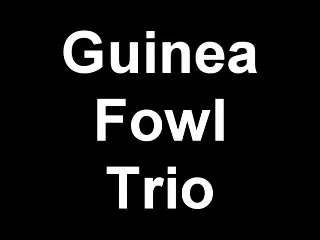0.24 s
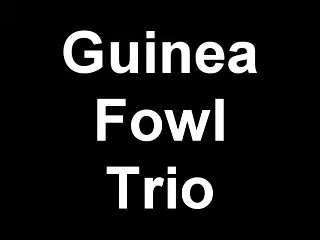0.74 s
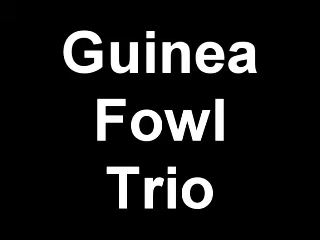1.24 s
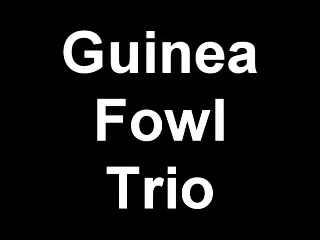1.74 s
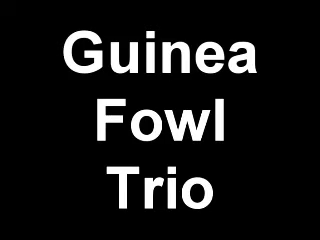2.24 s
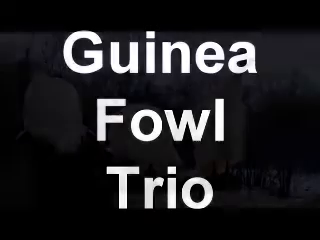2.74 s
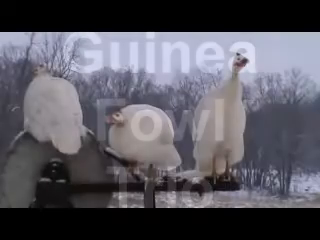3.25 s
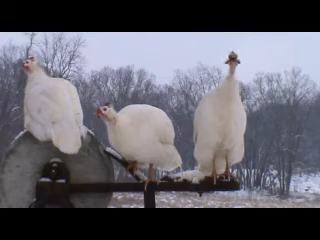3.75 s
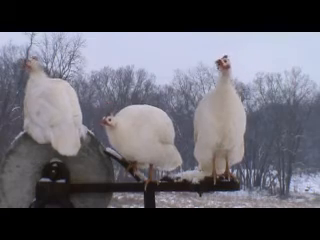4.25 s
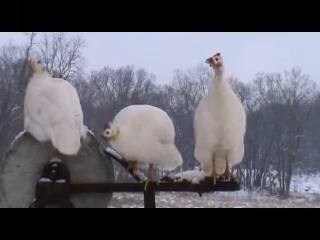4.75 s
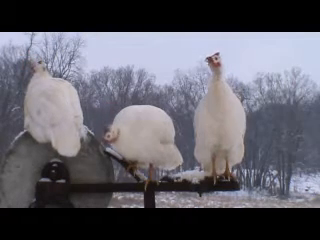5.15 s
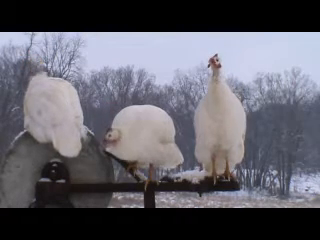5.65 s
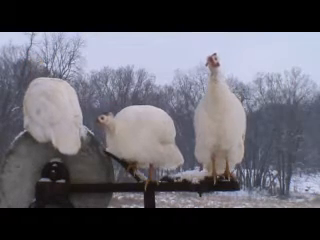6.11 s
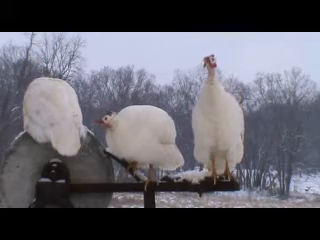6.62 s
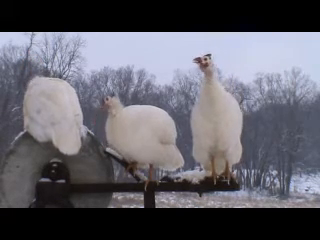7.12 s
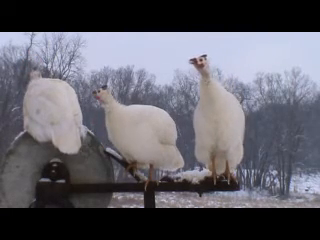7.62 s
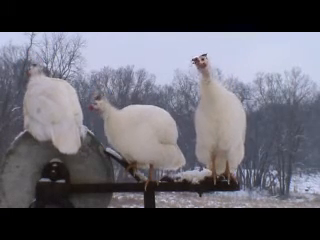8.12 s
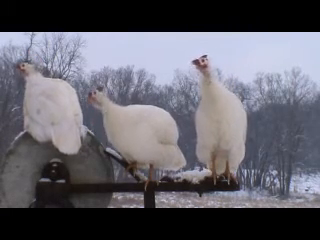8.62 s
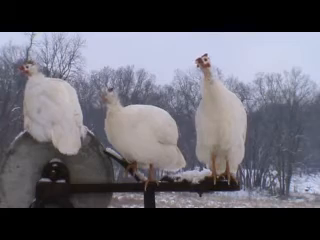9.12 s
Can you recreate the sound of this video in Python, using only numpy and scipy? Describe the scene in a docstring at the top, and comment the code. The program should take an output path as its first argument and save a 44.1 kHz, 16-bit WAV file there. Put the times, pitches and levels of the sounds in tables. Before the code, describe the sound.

Harsh guinea fowl squawks and a long falling wail cut off abruptly, followed by uneven three-bird chatter, buffeting wind and a few small chirps.

```python
"""A winter yard with guinea fowl. One very close bird gives harsh squawks, cries and a long falling wail, then
a trio chatters in thin whistles, low hoots and rasps. Clear notes are summed harmonics with a shaky pitch;
rasps are torn partials of a slow, uneven beat plus puffs of noise. Faint nasal moans are clear notes too.
Wind noise buffets the microphone, a small bird's chirps are falling tones with noise, and dry ticks are noise
bursts. Decaying noise gives a faint echo, over a low outdoor rumble, with a faint swelling treble hiss."""
import sys
import numpy as np
from scipy import signal
from scipy.fft import rfft, irfft, next_fast_len
from scipy.io import wavfile

SR = 44100
rng = np.random.default_rng(int(sys.argv[2]) if len(sys.argv) > 2 else 0)


def transcribe(u):
    """Save the signal u as a 16-bit wav file named by the first command-line argument.

    u: samples, shape (n,) or (channels, n), limited to [-1, 1]; the rate is SR.
    q: integer samples, one column per channel.
    """
    v = np.clip(np.atleast_2d(u).T, -1, 1)
    q = np.round(v * 32767).astype(np.int16)
    wavfile.write(sys.argv[1], SR, q)


N = 413216
TIME = np.arange(N) / SR
TOP_HZ = 15600
WAIL_END_S, TRIO_START_S = 2.145, 2.206
# progress through a call, and a bow that is 1 at both ends and 0 in the middle
PROGRESS = np.linspace(0, 1, 61)
BOW = (2 * PROGRESS - 1) ** 2


def undb(db):
    """Decibels to gain."""
    return 10 ** (np.asarray(db) / 20)


def unit(x):
    """Scale to rms 1."""
    return x / np.sqrt(np.mean(x ** 2) + 1e-18)


def colour_at(points, hz):
    """Gain of a (Hz, dB) colour at the given frequencies, interpolated over log frequency."""
    f, db = np.transpose(points)
    return undb(np.interp(np.log(np.maximum(hz, 1)), np.log(f), db))


def ring(points, size=1024):
    """Causal (minimum-phase) impulse response of a colour, from its cepstrum."""
    hz = np.arange(size + 1) * SR / (2 * size)
    cepstrum = irfft(np.log(colour_at(points, hz)))
    cepstrum[1:size] *= 2
    cepstrum[size + 1:] = 0
    return irfft(np.exp(rfft(cepstrum)))[:size]


def noise(points):
    """Noise of a given colour, rms 1."""
    size = next_fast_len(N, True)
    white = rfft(rng.standard_normal(size))
    hz = np.arange(len(white)) * SR / size
    return unit(irfft(white * colour_at(points, hz), size)[:N])


def walk(rate_hz):
    """Smooth random motion, rms 1, with rate_hz new random targets a second."""
    steps = rng.standard_normal(N // 8)
    return unit(np.interp(TIME * rate_hz, np.arange(len(steps)), steps))


def gate(start_s, end_s, edge_s):
    """Open from start to end, with soft edges centred on both."""
    return np.clip(np.minimum(TIME - start_s, end_s - TIME) / edge_s + .5, 0, 1)


def envelope(calls, axis=1, edge_s=.007):
    """Gain over time from one dB column of a list of calls, with soft edges."""
    out = np.zeros(N)
    for call in calls:
        s = call[:, 0]
        first_s, last_s = s[0] - edge_s, s[-1] + edge_s
        on = slice(*np.searchsorted(TIME, [first_s, last_s]))
        gain = np.pad(undb(call[:, axis]), 1)
        out[on] += np.interp(TIME[on], [first_s, *s, last_s], gain)
    return out


def strikes(events):
    """One impulse for each (s, dB) row."""
    out = np.zeros(N)
    for s, db in events:
        out[int(s * SR)] += undb(db)
    return out


def through(x, response):
    """Pass a sound through an impulse response."""
    return signal.oaconvolve(x, response)[:N]


def contour(start_s, length_s, *controls):
    """The controls of one call, laid out over its time."""
    return np.column_stack(np.broadcast_arrays(start_s + length_s * PROGRESS, *controls))


def arch(peak, start_db=-10.5, end_db=-20):
    """Level in dB of a push of air that builds up to its peak and dies away."""
    peak = np.clip(peak, .02, .98)
    build = start_db * (1 - PROGRESS / peak) ** 2
    decay = end_db * ((PROGRESS - peak) / (1 - peak)) ** 2
    return np.where(PROGRESS < peak, build, decay)


def swells(events):
    """Gain over time of a table of swells."""
    return envelope([contour(start, length, db + arch(peak)) for start, length, peak, db in events])


def beat(calls):
    """Pitch or beat rate (last column) over time: each call takes over from the one before."""
    starts = [call[0, 0] for call in calls[1:]] + [np.inf]
    rows = np.vstack([call[call[:, 0] < until] for call, until in zip(calls, starts)])
    return np.interp(TIME, rows[:, 0], rows[:, -1])


def notes(calls, throat, chaos, jitter, chaos_jitter, shimmer, upper_db, edge_s, tremble=0 * TIME):
    """A steadily beating syrinx; its pitch and strength shake more as the rasp (chaos) takes over."""
    out, shake, flutter, waver = np.zeros(N), walk(700), walk(450), walk(130)
    for call in calls:
        s, pitch, *levels = np.transpose(call)
        opening = gate(s[0], s[-1], edge_s)
        on = opening > 0
        *low, upper = (undb(np.interp(TIME[on], s, db)) for db in levels)
        rough = chaos[on] / (chaos[on] + sum(low))
        wobble = tremble[on] + jitter * waver[on] + chaos_jitter * rough * shake[on]
        hz = np.interp(TIME[on], s, pitch) * (1 + wobble)
        k = np.arange(1, int(TOP_HZ / pitch.min()) + 1)[:, None]
        # the lowest harmonics have their own levels; the upper ones share the throat's colour
        high = colour_at(throat, k[len(low):] * hz)
        high *= undb(upper_db) * upper / np.sqrt(np.sum(high ** 2, axis=0))
        phase = 2 * np.pi * k * np.cumsum(hz) / SR + k ** 2
        tone = np.sum(np.vstack([*low, high]) * np.sin(phase), axis=0)
        # a push of air that raises the pitch also makes the note louder
        push = 1 + shimmer * rough * flutter[on] + 11 * tremble[on]
        out[on] += np.sqrt(2) * tone * opening[on] * push
    return out


def beak_gain(beak, hz, strain):
    """An open-beak resonance that stands out more the harder the bird calls."""
    centre_hz, width_hz, db = beak
    return undb(db * strain ** 2 * np.exp(-((hz - centre_hz) / width_hz) ** 2))


def rasp_shapes(events, climb_hz_per_s):
    """Body and treble of a rasp swell together while its beat quickens."""
    return [contour(start, length, body + arch(peak), treble + arch(peak), hz + climb_hz_per_s * length * PROGRESS)
            for start, length, peak, body, treble, hz in events]


def rasp(calls, body, treble, beak, body_db, treble_db, tear_rad, count=10):
    """The voice broken into a slow, uneven beat; the harder the call, the more its partials tear apart."""
    strength = envelope(calls, axis=1)
    strain = .3 + np.minimum(strength / undb(-27), .7)
    rate = beat(calls) * (1 + .025 * strain * walk(60))
    cycle = np.cumsum(rate) / SR + .02 * strain * walk(300)
    low = np.zeros(N)
    for k in range(2, count):  # the throat does not pass the beat's own fundamental
        # each partial's level wanders, and its phase slips against the beat
        share = 1 + .6 * np.tanh(walk(140))
        slip = tear_rad * strain * walk(190)
        gain = colour_at(body, k * rate) * beak_gain(beak, k * rate, strain)
        low += gain * share * np.sin(2 * np.pi * k * cycle + k ** 2 + slip)
    # each beat lets out a puff of turbulent air
    puffs = unit((.4 + np.exp(-(cycle % 1) / .35)) * rng.standard_normal(N))
    pulses = unit(np.diff(np.floor(cycle), prepend=0))
    low = unit(low) + .08 * unit(through(puffs, ring(body)))
    treble_flicker = undb(3.5 * strain * np.tanh(walk(80)))
    high = unit(through(puffs + pulses, ring(treble))) * treble_flicker
    return undb(body_db) * low * strength + undb(treble_db) * high * envelope(calls, axis=2)


def echo(x, t60_s, db):
    """Scattered, dull reflections from ground, sheds and trees: decaying low-passed noise."""
    t = TIME[:SR // 2]
    tail = rng.standard_normal(len(t)) * np.exp(-np.log(1000) * t / t60_s) * (t > .004)
    tail = signal.lfilter([1], [1, -.45], tail)
    return undb(db) * through(x, tail / np.sqrt(np.sum(tail ** 2)))


# Outdoor air colours during the close bird and from the trio on. Each row: frequency in Hz, relative level in dB.
EARLY_AIR = [(15, -36), (25, -1.5), (110, -5.5), (297, -24.5), (433, -17), (495, -14.5), (567, -21),
             (1530, -22), (2700, -30.5), (7910, -42), (13900, -32), (15500, -53)]
YARD_AIR = [(15, -32), (25, 5), (126, 0), (260, -12), (895, -9), (1750, -7.5), (1900, -11.5), (2420, -17.5),
            (3170, -24), (3630, -24), (4870, -27), (5430, -27.5), (8580, -30), (12800, -33), (15500, -53)]
EARLY_AIR_DB, YARD_AIR_DB = -48, -45
# Treble hiss colour. Each row: frequency in Hz, relative level in dB.
HISS_COLOUR = [(2000, 2), (5000, -1.5), (7000, -2), (9000, 2.5), (11000, -1.5), (13000, -12.5),
               (15500, -39)]
# Hiss swells. Each row: start in seconds, length in seconds, peak place 0-1, relative level in dB.
HISS_SWELLS = [(.72, 1.17, 0.26, -43), (1.55, 0.65, 0.99, -42), (3.5, 2.12, 0, -44),
               (6.23, 0.49, 0.42, -43), (8.68, 0.79, 0.05, -44)]


def background(early, later):
    """Low outdoor rumble that wavers a little, and a faint treble hiss that swells."""
    air = early * undb(EARLY_AIR_DB) * noise(EARLY_AIR) + later * undb(YARD_AIR_DB) * noise(YARD_AIR)
    hiss = noise(HISS_COLOUR) * (undb(-64) + swells(HISS_SWELLS))
    return air * undb(.5 * walk(17)) + undb(-5.5) * hiss * (early + later)


# Gust swells. Each row: start in seconds, length in seconds, peak place 0-1, relative level in dB.
GUST = [(3.25, 0.081, 0.25, -49), (3.56, 0.45, 0.53, -38.5), (4.02, 0.12, 0.4, -47.5),
        (4.25, 0.28, 0.61, -39), (4.48, 0.21, 0.4, -39), (4.735, 0.052, 0.07, -37.5)]
# Single buffets. Each row: time in seconds, relative peak in dB.
BUFFETS = [(3.58, -27), (3.739, -25), (3.781, -18.5), (3.808, -18), (3.822, -20.5), (3.832, -21),
           (3.892, -18.5), (4.085, -29.5), (4.249, -20.5), (4.527, -24), (4.544, -23), (4.562, -23),
           (4.584, -21.5), (4.636, -18.5), (4.736, -16), (4.751, -22)]
# Wind colour at the microphone. Each row: frequency in Hz, relative level in dB.
WIND_COLOUR = [(30, -25), (80, -12.5), (150, -1), (330, 2), (600, -3), (900, -10), (1600, -13.5),
               (4000, -26), (12000, -28), (15500, -57)]


def wind():
    """Eddies flutter on the microphone; single buffets land as dull thumps."""
    eddies = noise(WIND_COLOUR) * swells(GUST) * undb(5.7 * np.tanh(walk(110)) + 5.5)
    dull = signal.butter(2, 1400, fs=SR, output="sos")
    thump = signal.sosfilt(dull, ring(WIND_COLOUR))
    return eddies + undb(5.0) * through(strikes(BUFFETS), thump / np.abs(thump).max())


# Light ticks. Each row: time in seconds, relative peak in dB.
TICKS = [(0.4632, -21.5), (0.503, -29.5), (0.6863, -22.5), (3.0719, -25.5), (4.0658, -21), (4.086, -22.5),
         (4.7379, -31)]
# Tick colour. Each row: frequency in Hz, relative level in dB.
TICK_COLOUR = [(1000, -10), (4000, 0), (6000, -0.5), (9000, 0.5), (15000, -8.5)]


def ticks(decay_s=0.0055, db=-6):
    """Small dry clicks: one coloured, decaying noise burst."""
    burst = rng.standard_normal(1024) * np.exp(-TIME[:1024] / decay_s)
    click = np.convolve(burst, ring(TICK_COLOUR))
    return undb(db) * through(strikes(TICKS), click / np.abs(click).max())


# Chirps. Each row: start in seconds, length in seconds, peak place 0-1, relative level in dB.
CHIRPS = [(2.608, 0.038, 0.25, -50), (4.26, .04, 0.43, -30.5), (4.957, .05, 0.44, -36),
          (7.555, 0.047, 0.38, -33.5), (7.998, 0.054, 0.32, -41)]
# Chirp scratch colour. Each row: frequency in Hz, relative level in dB.
CHIRP_COLOUR = [(1200, -20), (2400, -3), (3300, -17), (4300, -3), (5200, -19), (8000, -24), (15000, -55)]


def small_bird(start_hz=3760, end_hz=2740, tone_db=-0.5, scratch_db=1):
    """Short chirps: a shaky whistle falls through a scratch of noise."""
    flutter = undb(3 * walk(160))
    fall = start_hz + (end_hz - start_hz) * PROGRESS
    falls = [contour(start, length, fall) for start, length, *_ in CHIRPS]
    hz = beat(falls) * (1 + .05 * walk(500))
    tone = unit(np.sin(2 * np.pi * np.cumsum(hz) / SR))
    return (undb(scratch_db) * noise(CHIRP_COLOUR) + undb(tone_db) * tone) * flutter * swells(CHIRPS)


# Nasal moans. Each row: start in seconds, length in seconds, start pitch in Hz, rise in Hz, relative level in dB.
MOANS = [(0.123, .135, 552, 45, -44), (2.205, 0.4, 519.3, 50.1, -47), (2.674, 0.16, 577, 34.5, -43),
         (2.81, 0.18, 626, 34.1, -35.5)]
# Moan throat colour. Each row: frequency in Hz, relative level in dB.
MOAN_THROAT = [(500, -14), (1100, -8), (1650, 7.5), (2300, -2.5), (3600, -15.5), (4700, -4), (5400, -17.5),
               (7000, -23), (10000, -21), (15000, -26)]


def moans(root_db=-25, edge_db=1):
    """Quiet, rising nasal notes with hardly any fundamental."""
    calls = [contour(start, length, hz + rise * PROGRESS, db + root_db, db + edge_db * BOW)
             for start, length, hz, rise, db in MOANS]
    return notes(calls, MOAN_THROAT, np.ones(N), jitter=0.0137, chaos_jitter=0.0124, shimmer=.35,
                 upper_db=-2, edge_s=0.022, tremble=.018 * walk(13))


def hoot_shape(start, length, hz, glide_hz, dip_hz, db, *overtones_db, edge_db=-5.5, flatness=1.39):
    """A hoot bends in pitch and brightens in mid-note, where the beak is widest."""
    # higher flatness: flatter bottom of the dip
    pitch = hz + glide_hz * (PROGRESS - .5) + dip_hz * BOW ** flatness
    return contour(start, length, pitch, db, *(level + edge_db * BOW for level in overtones_db))


# Trio's low notes. Each row: start in seconds, length in seconds, middle pitch in Hz, glide in Hz, dip in Hz,
# fundamental in dB, then mid-note 2nd harmonic, 3rd harmonic and upper harmonics in relative dB.
HOOTS = [(3.442, 0.042, 974, -76, -12, -22, -26.5, -37.5, -36),
         (3.705, 0.11, 916, 68, 105.5, -23, -21.5, -33, -37),
         (3.878, 0.01, 1055, -74, 22, -22.5, -27.5, -40, -35),
         (5.882, 0.037, 1064, -44, -14, -22, -33.5, -48, -34),
         (6.149, 0.059, 955.4, 5, 45, -22.5, -34, -37, -37.5),
         (6.559, 0.014, 1052, -49, 1, -27, -31, -43, -37.5),
         (6.787, 0.015, 1058, -60, -1, -37.5, -46, -60, -62),
         (6.975, .14, 1021, 104, 59.5, -36, -35, -53, -56),
         (7.269, 0.052, 892, -35, 30, -23.5, -32.5, -35, -37),
         (7.349, 0.014, 926, -12.5, 5, -31, -42, -44.5, -52.5),
         (7.513, .122, 905.6, -4.5, 40.5, -24.5, -33.5, -34, -41),
         (7.662, 0.034, 1109, 15, 2, -25.5, -40, -62, -56),
         (8.072, 0.11, 1100, 69.5, 12, -30.5, -32.5, -46, -46.5),
         (8.462, 0.044, 875.4, -21, 13.5, -24.5, -32.5, -40, -36),
         (8.719, 0.015, 944, 2, 8, -28, -45, -42, -39), (8.75, 0.11, 891.4, 45, 71.5, -25, -26.5, -33, -42),
         (8.995, 0.13, 1054, 81, 37.5, -34, -32.5, -45.5, -46)]
# Trio's throat colour. Each row: frequency in Hz, relative level in dB.
TRIO_THROAT = [(2800, 17), (3800, 9.5), (4600, 5), (5400, 20.5), (6300, 10), (7000, 4), (7800, 4.5),
               (9000, 2), (10400, 10), (11700, 5), (12800, -23), (15000, -53)]


def hoots(chaos):
    """Low nasal notes that always keep a trace of hoarseness."""
    return notes([hoot_shape(*row) for row in HOOTS], TRIO_THROAT, chaos + undb(-36), jitter=0.0063,
                 chaos_jitter=.018, shimmer=0.3, upper_db=2.5, edge_s=.008)


# Trio's grace notes. Each row: start in seconds, length in seconds, middle pitch in Hz, glide in Hz, level in dB.
GRACE_NOTES = [(4.145, .018, 3035, -60, -46), (4.513, .02, 3070, 75, -40.5),
               (5.375, 0.031, 3084, 120, -40.5), (6.41, .018, 3010, 17, -46),
               (8.291, .016, 3020, 26.5, -42), (9.246, 0.058, 3043, 37, -42.5)]


def grace_notes(chaos, upper_db=-10):
    """Thin, high grace notes, most of them just before a whistle, one before a rasp."""
    graces = [contour(start, length, hz + glide * (PROGRESS - .5), db, db + upper_db)
              for start, length, hz, glide, db in GRACE_NOTES]
    return notes(graces, TRIO_THROAT, chaos, jitter=0.0076, chaos_jitter=0.0091, shimmer=0.59,
                 upper_db=-1, edge_s=.009)


def whistle_shape(start, length, hz, rise_hz, db, swell_db, second_db, upper_db,
                  sag_db=-4, drop_hz=91, drop_s=0.0118):
    """A whistle bends ever more slowly, sags in level mid-note, then drops in pitch as it breaks."""
    drop = np.exp(-length * (1 - PROGRESS) / drop_s)
    pitch = hz + rise_hz * np.sin(np.pi / 2 * PROGRESS) - drop_hz * drop
    effort = swell_db * (PROGRESS - .5) + sag_db * (1 - BOW)
    return contour(start, length, pitch, db + effort, second_db + effort, upper_db + effort)


# Trio's whistles. Each row: start in seconds, length in seconds, start pitch in Hz, rise in Hz, relative level in dB,
# swell over the note in dB, 2nd harmonic in relative dB, upper harmonics in relative dB.
WHISTLES = [(2.8, 0.16, 2488, 135, -36, 15, -50, -53), (3.515, 0.032, 2540, 46, -37, 4, -60, -54),
            (3.745, 0.069, 2573, 17, -36.5, -14, -38, -47), (3.821, 0.059, 2653, -2, -25.5, 7, -33, -38),
            (4.525, 0.12, 2557, 105.5, -28.5, 8.5, -34.5, -39), (5.228, 0.026, 2540, 50, -34, 2, -59, -46),
            (5.395, 0.1, 2560, 117.5, -29, 9.5, -35.5, -43), (6.131, 0.018, 2500, 23.5, -38, 4, -53, -49),
            (6.425, 0.139, 2457, 120, -29.5, 3, -33.5, -44), (7.24, .03, 2505, 11, -32.5, 2, -47, -52),
            (7.466, 0.1524, 2474, 64.5, -24.5, 3, -30.5, -44.5),
            (8.325, 0.144, 2483, 147.5, -27, 1, -32.5, -45), (9.301, 0.0854, 2557, 45, -34, -10, -38, -49)]


def whistles(chaos):
    """Thin, nearly pure high notes."""
    return notes([whistle_shape(*row) for row in WHISTLES], TRIO_THROAT, chaos, jitter=0.0048,
                 chaos_jitter=0.0073, shimmer=0.19, upper_db=0, edge_s=0.0082)


# Trio's rasps. Each row: start in seconds, length in seconds, peak place 0-1, relative body level in dB,
# relative treble level in dB, starting beat in Hz.
RASPS = [(2.42, .18, 0.66, -53.5, -61, 549), (2.805, .13, 0.36, -35, -52, 621.5),
         (2.925, .095, 0.66, -30.5, -46.5, 365.3), (3.02, .06, 0.5, -46, -52, 373),
         (3.248, .11, 0.31, -37.5, -53, 353.3), (3.52, .045, 0.36, -36, -53, 617),
         (3.78, .13, 0.85, -38, -58, 328), (3.922, .045, 0.42, -33, -45, 349),
         (4.2, 0.062, 0.25, -25.5, -33.5, 345), (4.245, .07, .5, -26.5, -39.5, 368),
         (4.371, 0.12, 0.04, -26, -52.5, 340.5), (4.628, .042, 0.45, -30, -53, 350),
         (5.238, .06, 0, -30.5, -52.5, 349), (5.372, .06, 0.39, -39, -49, 498),
         (5.468, .135, 0.17, -29, -50.5, 338.4), (6.135, .02, 0.66, -31, -56, 399.2),
         (6.188, 0.13, 0.13, -23.5, -45, 344), (6.545, .045, 0.03, -33.5, -48, 345.6),
         (6.71, .085, 0.14, -41, -56, 351.4), (6.868, .14, 0.13, -32, -51.5, 346.7),
         (7.243, .03, .7, -35.5, -51, 420), (7.445, .085, 0.69, -32.5, -44.5, 488),
         (7.555, .16, 0.48, -23.5, -40.5, 336.3), (7.843, 0.021, .25, -36.5, -60, 350.7),
         (7.908, .125, .1, -32, -52, 346.4), (8.035, .05, 0.64, -32.5, -47, 343),
         (8.148, .045, 0.38, -27.5, -52.5, 370), (8.293, .027, 0.38, -34, -46.5, 493),
         (8.453, .065, 0.26, -28.5, -42.5, 349.5), (8.645, .06, 0.25, -37.5, -60.5, 468.2),
         (8.718, .17, 0.51, -25.5, -34.5, 342.7), (8.86, .1, 0.13, -30.5, -53, 353.6),
         (8.968, .037, 0.58, -30, -54, 365.5), (9.072, .07, .5, -35.5, -53, 363),
         (9.24, .06, 0.44, -34, -45.5, 492)]
# Body and treble colours of the rasps. Each row: frequency in Hz, relative level in dB.
RASP_BODY = [(300, -7), (800, -15), (950, -22), (1090, 6.5), (1250, 3), (1450, 1.5), (1650, -4), (1830, 4),
             (2150, -9), (2500, -12), (3100, -16), (3800, -47), (5000, -53)]
RASP_TREBLE = [(2000, -37), (3700, -5), (4500, 9), (5200, 7.5), (5900, 0), (6800, -7), (7700, -11),
               (8500, -11.5), (9500, -4.5), (11300, -10), (12500, -24), (15500, -44)]
RASP_BEAK = (1330, 250, 4.05)  # centre Hz, width Hz, gain dB at strain 1


def trio():
    """Whistles, low hoots and rasps; the two sides of a syrinx can sound together."""
    rasps = rasp_shapes(RASPS, climb_hz_per_s=270)
    chaos = envelope(rasps)
    harsh = rasp(rasps, RASP_BODY, RASP_TREBLE, RASP_BEAK, body_db=1.98, treble_db=5.5, tear_rad=.45)
    return hoots(chaos) + whistles(chaos) + grace_notes(chaos) + harsh


def cry_shape(start, length, hz, scoop_hz, glide_hz, db, odd_db, upper_db,
              scoop_s=.015, glide_s=0.024, edge_db=-5.5, third_db=-2.5):
    """A cry scoops up, holds and glides off, loudest in the middle; its second harmonic leads."""
    t = length * PROGRESS
    scoop = scoop_hz * np.exp(-(t / scoop_s) ** 2)
    glide = glide_hz * np.exp(-((length - t) / glide_s) ** 2)
    level = db + edge_db * BOW ** 2
    return contour(start, length, hz - scoop + glide, level + odd_db, level, level + odd_db + third_db, upper_db)


# Close bird's cries. Each row: start in seconds, length in seconds, held pitch in Hz, scoop in Hz, final glide in Hz,
# mid-note 2nd harmonic in dB, fundamental against it in dB, upper harmonics in relative dB.
CRIES = [(0.329, 0.098, 882, 29.5, -9, -21.5, -18, -56), (0.573, 0.082, 1136, 172, -87, -18, -9, -33.5),
         (0.77, .237, 1105, 11, -225, -20, -7.5, -33), (1.083, .08, 944, 32, 147.5, -28.5, -7, -46)]
# Throat colour in the cries. Each row: frequency in Hz, relative level in dB.
CRY_THROAT = [(1000, 4), (3300, 29), (4400, 6.5), (5600, 6), (6600, -8), (7800, 7), (8800, 11.5), (9700, 1),
              (11000, 4), (12100, -4), (13200, 10), (14300, -4), (15600, -11)]


def cries(chaos):
    """Cries that never quite lose their rasp; the long one trembles at 38 Hz."""
    tremble = .018 * gate(.79, .97, .03) * np.cos(2 * np.pi * 38 * (TIME - .86))
    return notes([cry_shape(*row) for row in CRIES], CRY_THROAT, chaos + undb(-29), jitter=0.0037,
                 chaos_jitter=.062, shimmer=0.71, upper_db=-1, edge_s=0.011, tremble=tremble)


# Long wail before and after the voice breaks to a lower note, one list per note.
# Each row: time in seconds, pitch in Hz, relative level in dB.
WAILS = [
    [(1.16, 1097, -20), (1.25, 1115, -23), (1.306, 1096, -20), (1.434, 1082, -25), (1.458, 1057, -24.5),
     (1.582, 1055, -27), (1.66, 1045, -26.5)],
    [(1.76, 908, -21), (1.788, 911.4, -18.5), (1.95, 902, -16.5), (2.124, 877, -22), (2.132, 880.0, -26)],
]
# Harmonic mix of the two notes. Each row: fundamental, 2nd, 3rd, upper harmonics, in relative dB.
WAIL_MIX = [(-10, -2, -9, -15), (-22, 0, -26, -26)]
# Throat colour in the wail. Each row: frequency in Hz, relative level in dB.
WAIL_THROAT = [(3300, 9), (4400, -12.5), (5600, -15), (6500, -8.5), (7800, -9), (8700, 0.5), (9700, -14),
               (11000, 3.5), (12100, -21), (13200, 13), (14300, -37), (15600, -1)]


def wail(chaos):
    """A long falling cry whose voice breaks to a lower note."""
    held = [[(s, hz, *(db + np.array(mix))) for s, hz, db in curve] for curve, mix in zip(WAILS, WAIL_MIX)]
    return notes(held, WAIL_THROAT, chaos, jitter=0.0041, chaos_jitter=0.035, shimmer=0.28,
                 upper_db=1.5, edge_s=.012)


# Close bird's rasps. Each row: start in seconds, length in seconds, peak place 0-1, relative body level in dB,
# relative treble level in dB, starting beat in Hz.
SQUAWKS = [(.232, .045, 0.4, -43, -66, 653), (.312, 0.15, .47, -29.5, -45.5, 477),
           (.546, 0.057, 0.33, -25.5, -56, 442.7), (.63, 0.063, 0.42, -26, -57, 515.2),
           (.737, .075, 0.45, -23, -53, 440), (.78, .2, 0.32, -55, -52.5, 548),
           (.98, 0.087, 0.45, -28, -57, 467.1), (1.06, .135, 0.4, -25, -54, 468.3),
           (1.648, 0.086, 0.38, -25.5, -49.5, 476), (1.705, .08, .5, -26, -53, 463),
           (1.85, 0.13, .25, -36, -59, 456)]
# Body and treble colours of the squawks. Each row: frequency in Hz, relative level in dB.
SQUAWK_BODY = [(300, -58), (700, 13.5), (930, -5), (1150, -2.5), (1500, 9), (1800, 4.5), (2100, 6.5),
               (2450, 9), (2900, -9.5), (3300, 0), (4000, -15), (5000, -56)]
SQUAWK_TREBLE = [(3000, -110), (4400, 3), (5600, 7), (6400, 16), (7000, 5), (7700, 20), (8350, -4),
                 (8900, 22.5), (9700, -18), (10500, 15), (11600, 0), (13200, 14), (15500, -1)]
SQUAWK_BEAK = (1800, 360, 0.91)  # centre Hz, width Hz, gain dB at strain 1


def close_bird():
    """Squawks that clear into cries and a long wail."""
    squawks = rasp_shapes(SQUAWKS, climb_hz_per_s=30)
    chaos = envelope(squawks)
    harsh = rasp(squawks, SQUAWK_BODY, SQUAWK_TREBLE, SQUAWK_BEAK, body_db=3.0, treble_db=10.5, tear_rad=.55)
    return cries(chaos) + wail(chaos) + harsh


def scene():
    """Close bird, dead centre, and its background cut off at 2.145 s; a brief dropout, then the trio off centre."""
    early = np.clip((WAIL_END_S - TIME) / 0.015 + .5, 0, 1)
    later = np.clip((TIME - TRIO_START_S) / 0.1 + .5, 0, 1)
    first, flock, gust = close_bird(), trio() + small_bird(), wind()
    first = early * (first + echo(first, t60_s=0.27, db=-16))
    flock_echo = echo(flock, t60_s=0.31, db=-16.5)
    mid = first + flock + moans() + flock_echo + gust + ticks() + background(early, later)
    # the deepest rumble reaches both ears alike
    no_rumble = signal.butter(2, 140, "high", fs=SR, output="sos")
    wide_air = signal.sosfilt(no_rumble, noise(YARD_AIR))
    # a quarter-cycle shift puts wind, trio and small bird out of step between the sides
    skewed = signal.hilbert(0.4 * gust + 0.18 * flock, next_fast_len(N)).imag[:N]
    side_echo = echo(flock, t60_s=0.24, db=-12.5)
    side = -.07 * flock + side_echo + skewed + later * undb(YARD_AIR_DB - 7.5) * wide_air
    return np.array([mid + side, mid - side])


def record(dry):
    """A steep elliptic low-pass cuts the top of the treble."""
    return signal.sosfilt(signal.ellip(10, .2, 80, TOP_HZ, fs=SR, output="sos"), dry)


dry = scene()
out = record(dry)
transcribe(out)
```